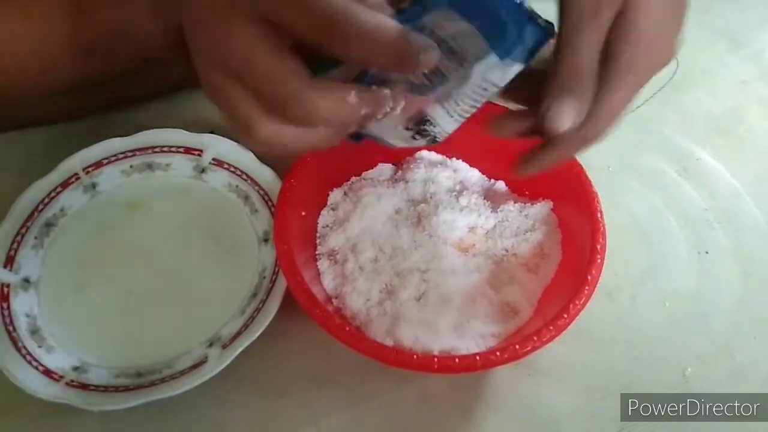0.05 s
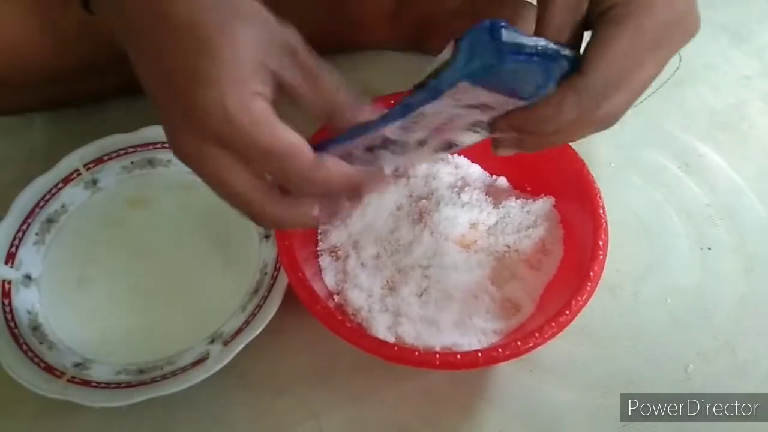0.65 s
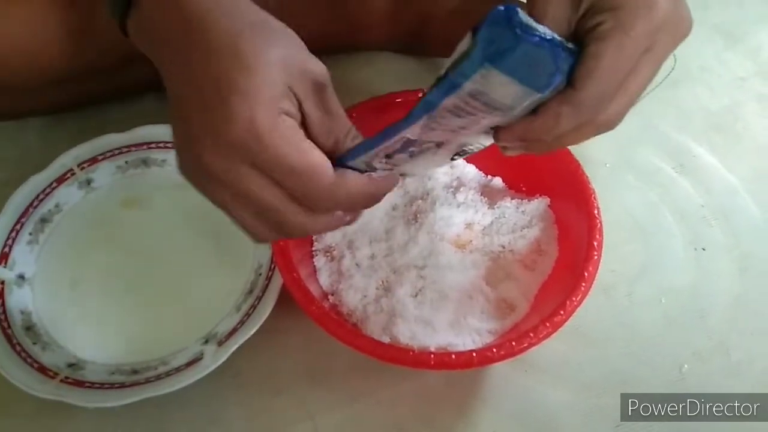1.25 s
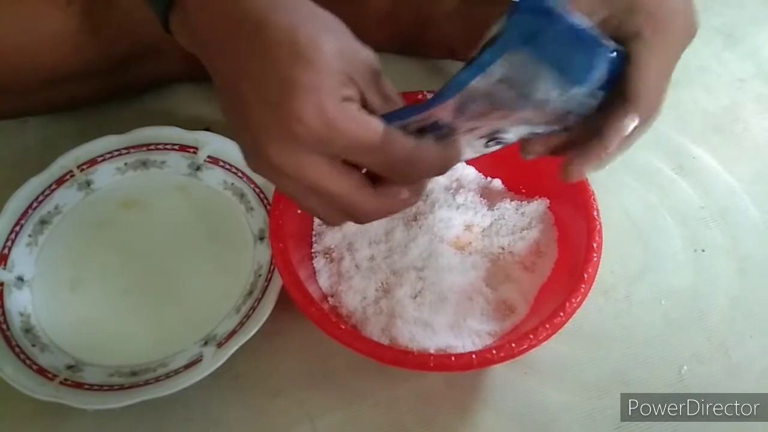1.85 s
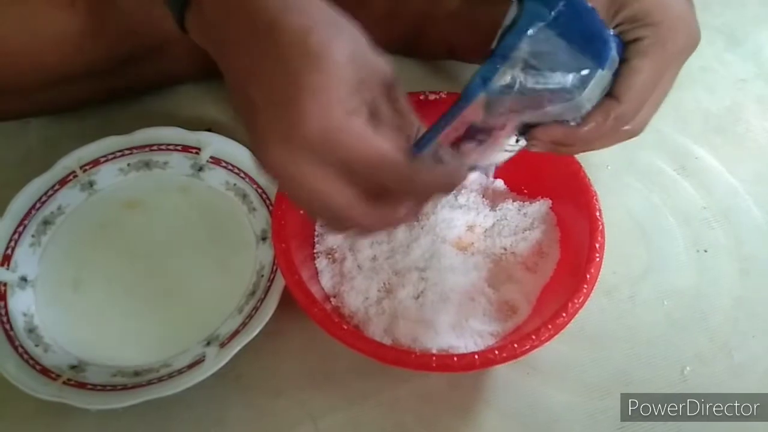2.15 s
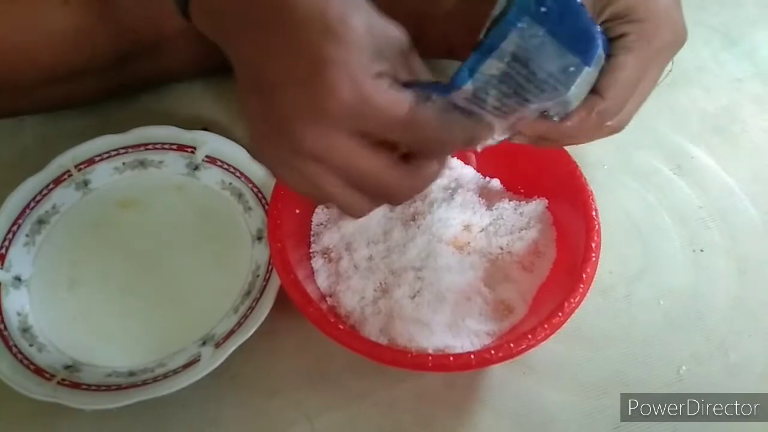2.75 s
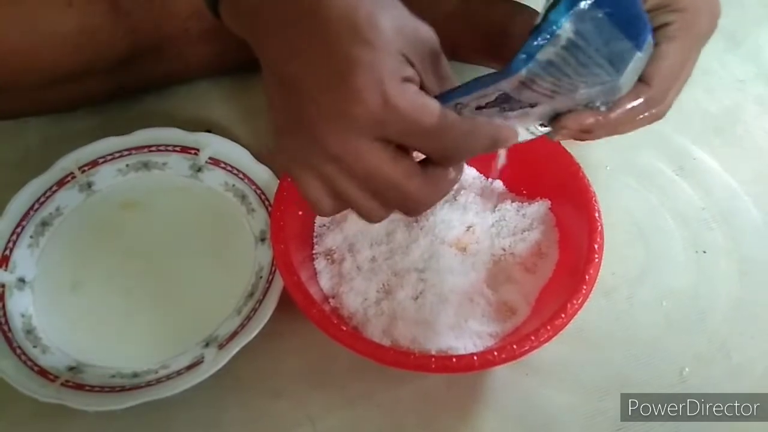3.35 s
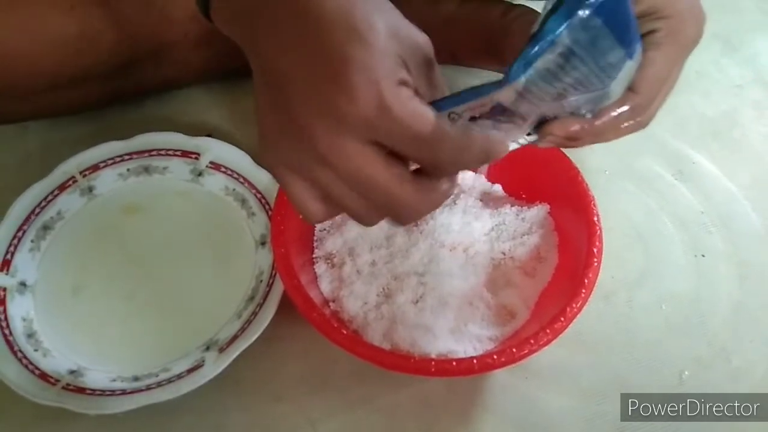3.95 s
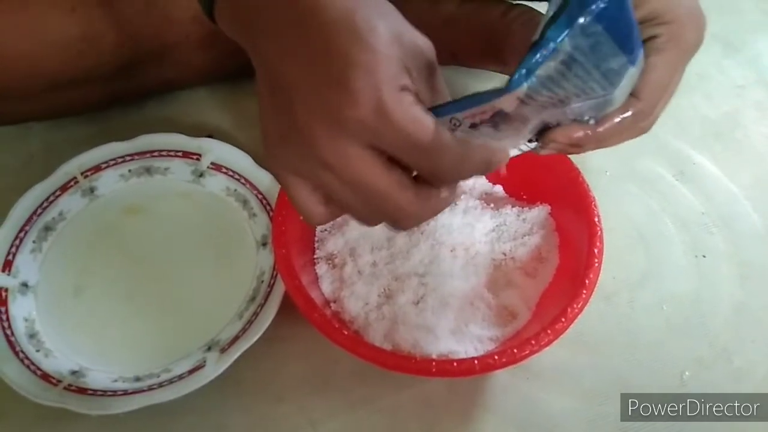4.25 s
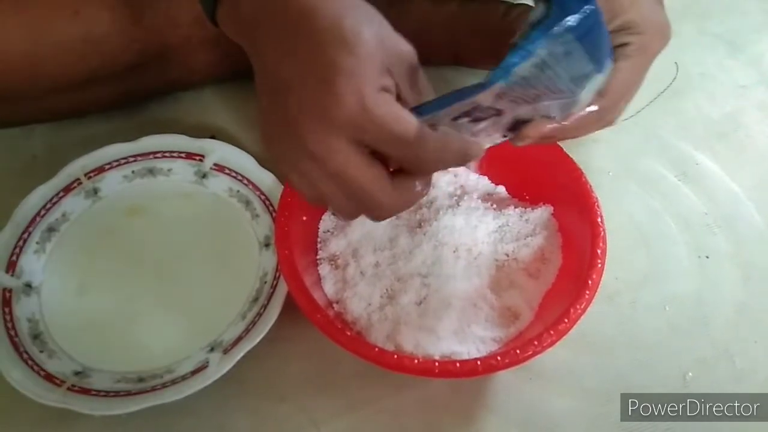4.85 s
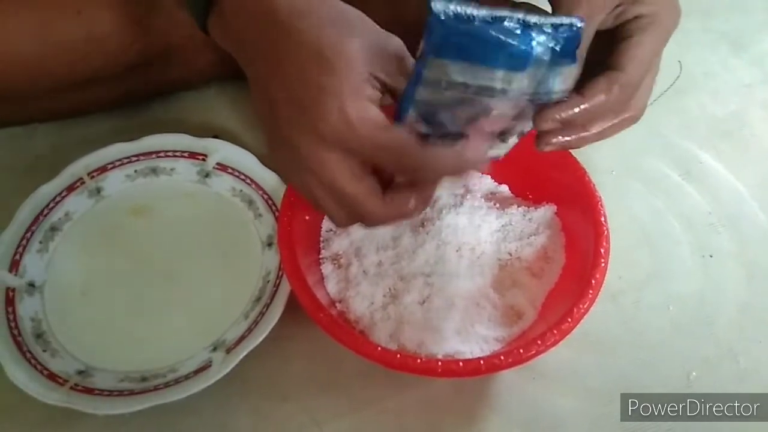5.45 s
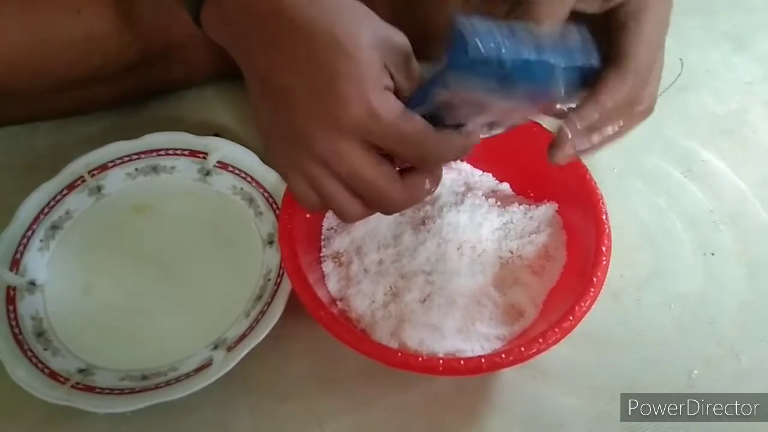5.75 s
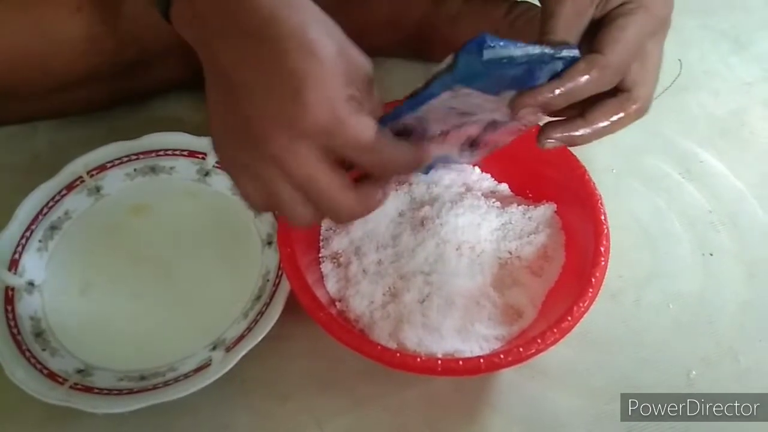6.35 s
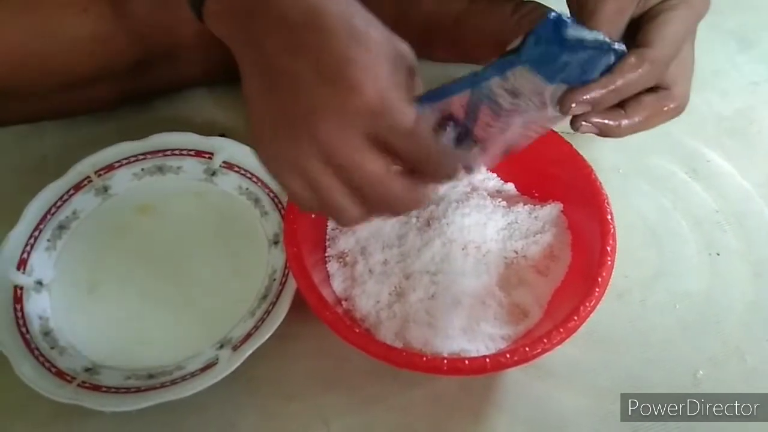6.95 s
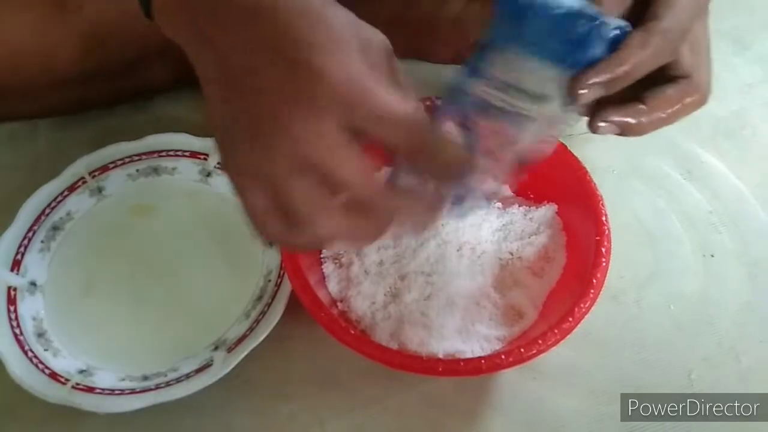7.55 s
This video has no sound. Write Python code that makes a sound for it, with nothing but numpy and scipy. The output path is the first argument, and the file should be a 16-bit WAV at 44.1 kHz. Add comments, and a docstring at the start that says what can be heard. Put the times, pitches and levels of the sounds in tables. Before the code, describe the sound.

Hands knead and shake a small plastic salt packet, making sharp crackles and quick gritty rattles, with faint traffic far outside.

```python
"""A plastic sachet of coarse salt is shaken and kneaded over a bowl, close by in a small hard room.
Each shake throws the salt against the plastic film. Each squeeze makes the creases crackle and snap,
and a few times a whole panel pops through. Loose grains patter on the heap or slide with a hiss.
Far traffic drones outside, and the two hands bump softly now and then."""
import sys
import numpy as np
from scipy import signal
from scipy.fft import next_fast_len
from scipy.io import wavfile

SR = 44100
rng = np.random.default_rng(int(sys.argv[2]) if len(sys.argv) > 2 else 0)


def dump(signal):
    """Clip the signal to [-1, 1] and save it as 16-bit WAV at the path in sys.argv[1]."""
    limited = np.clip(np.atleast_2d(signal).T, -1, 1)
    pcm = np.round(limited * 32767).astype(np.int16)
    wavfile.write(sys.argv[1], SR, pcm)


N = 338864
T = np.arange(N) / SR

# tone of the crackling film: (frequency [Hz], relative level [dB])
FILM_TONE = [(100, -38), (350, -26), (800, -21), (1400, -15.5), (2200, -7), (3500, 1), (5500, 1.5),
             (6500, 4.5), (7200, 1), (8100, -10.5), (9800, -9.5), (11500, -18.5), (15500, -20.5)]
# hollow resonances of the sachet between the hands: (frequency [Hz], width [Hz], boost [dB])
SACHET_RESONANCES = [(569, 256, 11), (1093, 286, 7.5), (1577, 184, 4), (2014, 360, 4.5)]


def amp(db):
    """Turns decibels into a gain."""
    return 10 ** (np.asarray(db) / 20)


def unit(x):
    """Scales a signal to an average strength (rms) of 1."""
    return x / np.sqrt(np.mean(x ** 2) + 1e-20)


def read(points, hz):
    """Looks up a table's value at hz, on a log-frequency axis."""
    f, value = np.transpose(points)
    return np.interp(np.log(hz + 1), np.log(f + 1), value)


def add(mix, s, sound):
    """Mixes a sound in at s seconds."""
    part = mix[max(round(s * SR), 0):][:len(sound)]
    part += sound[:len(part)]


def colour(points, resonances=(), size=2048):
    """Builds a filter (an impulse response of energy 1) with the given tone and resonances."""
    hz = abs(np.fft.fftfreq(size, 1 / SR))
    boost_db = sum(lift / (1 + (2 * (hz - f) / width) ** 2) for f, width, lift in resonances)
    log_gain = np.log(amp(read(points, hz) + boost_db))
    spectrum = np.exp(np.conj(signal.hilbert(log_gain)))  # minimum phase keeps clicks sharp
    response = np.fft.ifft(spectrum).real[:size // 2]
    return response / np.linalg.norm(response)


def through(x, response):
    """Filters a signal and keeps its length."""
    return signal.oaconvolve(x, response)[:len(x)]


def steadied(x, steady_s):
    """Evens out the strength to about 1 over any stretch of steady_s."""
    window = signal.windows.hann(int(2 * steady_s * SR) + 2)
    power = signal.oaconvolve(x ** 2, window / window.sum(), "same")
    return x / np.sqrt(abs(power) + 1e-9)


def dulled(x, edge_hz):
    """Softens everything above edge_hz."""
    return signal.sosfilt(signal.butter(2, edge_hz, fs=SR, output="sos"), x)


def murmur(width_hz):
    """Smooth random wavering (complex numbers); more width makes it faster."""
    hz = np.fft.fftfreq(next_fast_len(N), 1 / SR)
    phases = np.exp(2j * np.pi * rng.random(len(hz)))
    waver = np.fft.ifft(phases / (1 + (hz / width_hz) ** 4))[:N]
    return waver / np.std(waver)


def swelling(texture, s, width_s, db, hz, glide):
    """A gliding pitch, roughened by texture, that swells up to time s and fades."""
    tone = np.exp(2j * np.pi * np.cumsum(hz + glide * (T - s)) / SR)
    return amp(db) * np.exp(-.5 * ((T - s) / width_s) ** 2) * unit((tone * texture).real)


def grains(per_s, spread_db, ring_s, steady_s, click=1.08, top_hz=9000, size=220):
    """An even stream of tiny cracks, each a click with its own strength, pitch and short ring."""
    chance = rng.random((4, N))
    at = np.flatnonzero(chance[0] < per_s / SR)
    heft, pitch, ring = chance[1:, at, None]
    t = np.arange(size) / SR
    decay = ring_s * (.5 + ring)
    gain = amp(spread_db * np.minimum(-np.log(1 - heft), 4)) * (-1) ** at[:, None]
    cracks = gain * (np.exp(-t / decay) * np.cos(2 * np.pi * top_hz * pitch * t) + click * (t == 0))
    stream = np.bincount((at[:, None] + np.arange(size)).ravel(), cracks.ravel(), N + size)[:N]
    return steadied(stream, steady_s)


def kneading(grip_s=.0076, relax_s=.0058, held_db=-45.5, rest_db=-8.5):
    """How hard the fingers work the film: each squeeze tightens, holds and lets go."""
    # squeezes of the fingers: (start [s], length [s], level [dB])
    squeezes = [(0.057, 0.057, -37), (0.187, 0.12, -41.5), (0.486, 0.17, -36), (0.782, 0.28, -37),
                (1.49, .14, -38), (1.845, 0.11, -41.5), (1.98, 0.22, -37.5), (2.236, 0.087, -31.5),
                (2.474, 0.079, -37), (2.655, 0.32, -34), (3.222, 0.31, -37), (3.653, 0.5, -37),
                (4.219, 0.15, -35), (4.427, 0.075, -34), (4.803, 0.437, -45), (5.56, 0.21, -40),
                (5.885, 0.47, -34.5), (6.39, 0.23, -39.5), (6.859, 0.42, -34.5), (7.507, 0.18, -34.5)]
    # the film goes quieter while the hands change grip: (start [s], end [s])
    rests = [(.31, 0.51), (2.56, 2.64), (4.661, 4.71), (5.78, 5.84), (7.35, 7.53)]
    power = amp(held_db) ** 2
    for s, length, db in squeezes:
        tighten = np.clip((T - s) / grip_s + .5, 0, 1)
        relax = np.exp(-np.maximum(T - s - length, 0) / relax_s)
        power = power + (amp(db) * tighten * relax) ** 2
    resting = sum(np.clip(np.minimum(T - start, end - T) / grip_s, 0, 1) for start, end in rests)
    return np.sqrt(power) * amp(rest_db * resting)


def film_crackle(gain_db=-1, flurries_per_s=210, spread_db=3.6, flurry_s=.0022, floor=.2):
    """Creases give way in little avalanches: one crack sets off a flurry a few milliseconds long."""
    starts = rng.random(N) < flurries_per_s / SR
    strengths = amp(spread_db * np.minimum(rng.exponential(1, N), 2))
    flurries = signal.lfilter([1], [1, -np.exp(-1 / (flurry_s * SR))], starts * strengths) + floor
    cracks = grains(per_s=6500, spread_db=2.5, ring_s=.00025, steady_s=.004)
    crackle = through(steadied(flurries * cracks, steady_s=.057), colour(FILM_TONE, SACHET_RESONANCES))
    return amp(gain_db) * kneading() * dulled(crackle, edge_hz=11000)


def salt_trickle(patter_db=-3.5):
    """Loose grains patter on the heap; now and then some slide along the film with a thin hiss."""
    # tone of grains landing: (frequency [Hz], relative level [dB])
    landing_tone = [(300, -16), (1500, -20.5), (3500, -7.5), (6800, -2), (8500, -17.5), (12000, -31),
                    (16000, -27)]
    # flow of loose grains: (time [s], level [dB])
    flow = [(0, -54), (.28, -43.5), (.42, -57.5), (3.6, -38.5), (4.68, -71), (5.5, -43.5), (5.85, -49.5),
            (7.36, -35), (7.44, -47), (7.68, -41)]
    # sliding salt: (loudest at [s], swell width [s], level [dB], pitch [Hz], glide [Hz/s])
    slides = [(.33, .07, -53, 5500, -1), (5.599, 0.16, -47, 6400, -1000), (6.75, 0.19, -49, 6740, -1)]
    patter = through(grains(per_s=1500, spread_db=4.5, ring_s=.00023, steady_s=.058), colour(landing_tone))
    out = amp(patter_db + np.interp(T, *np.transpose(flow))) * patter
    hiss = murmur(width_hz=370)
    for slide in slides:
        out += swelling(hiss, *slide)
    return out


def far_traffic(waver=.35):
    """Far engines drone in and out of the street's rumble."""
    # tone of the rumble: (frequency [Hz], relative level [dB])
    street_tone = [(20, -29), (45, -19), (65, -16.5), (90, 3), (135, 0), (200, -5), (300, -12),
                   (450, -17.5), (1000, -20.5), (4000, -30), (15000, -55)]
    # slow swell of the rumble: (time [s], level [dB])
    swell = [(0, -52.5), (4, -51), (5.6, -53), (7.68, -51)]
    # engines: (loudest at [s], swell width [s], level [dB], pitch [Hz], glide [Hz/s])
    engines = [(.4, 0.4, -52.5, 146, 7.5), (.45, .4, -54.5, 165, 14), (1.717, 0.35, -56, 141, 2.5),
               (1.6, 0.69, -57, 80, 6), (5.63, 0.51, -53.5, 139, 0.5)]
    rumble = through(rng.standard_normal(N), colour(street_tone, size=8192))
    out = amp(np.interp(T, *np.transpose(swell))) * rumble
    for engine in engines:
        out += swelling(1 + waver * murmur(width_hz=4), *engine)
    return out


def salt_shakes(gain_db=-2.5, body_hz=1900):
    """Salt hits the film in a dense spray and settles; a gentle shake lasts longer and sounds deeper."""
    # shakes, in bouts of about 13 a second: (loudest at [s], level [dB])
    shakes = [(0.023, -31), (.262, -32.5), (0.498, -29), (.529, -30), (.837, -29.5), (.883, -31.5),
              (.99, -45), (1.034, -30), (1.198, -29.5), (1.264, -28.5), (1.323, -27), (1.413, -33),
              (1.693, -25.5), (1.917, -31), (2.275, -26.5), (2.362, -18), (2.431, -26.5), (2.642, -23.5),
              (2.826, -27), (2.931, -23), (3.006, -23.5), (3.074, -28), (3.152, -27), (3.262, -28),
              (3.291, -24), (3.358, -20.5), (3.51, -31), (3.582, -19), (3.679, -23.5), (3.754, -19),
              (3.851, -22.5), (3.932, -19), (4.022, -26.5), (4.083, -24.5), (4.16, -25.5), (4.228, -26.5),
              (4.309, -25.5), (4.393, -27.5), (4.586, -31.5), (4.728, -34.5), (4.802, -31.5),
              (4.875, -27.5), (4.961, -25.5), (5.03, -23.5), (5.119, -26), (5.185, -27.5), (5.279, -27.5),
              (5.346, -31), (5.847, -35.5), (5.931, -25), (6.124, -31), (6.236, -23), (6.376, -29),
              (6.454, -22), (6.527, -25.5), (6.609, -26), (6.691, -27), (6.987, -26.5), (7.089, -23),
              (7.32, -21), (7.48, -28), (7.585, -22.5)]
    # tone of salt hitting the film: (frequency [Hz], relative level [dB])
    salt_tone = [(80, -32.5), (250, -17), (420, -27.5), (800, -22), (1400, -19), (2200, -10.5), (3600, -2),
                 (5500, -2), (6400, 1), (7200, -1.5), (8100, -13), (9800, -13), (11500, -24.5),
                 (15500, -28.5)]
    usual_db, rise_s, fall_s, body_db = -27, .0073, .0072, 2.18  # an ordinary shake
    briefer_per_db, body_per_db = .0288, -.4  # how a harder one differs
    high_power, low_power = np.zeros((2, N))
    for s, db in shakes:
        force_db = db - usual_db
        width_s = np.where(T < s, rise_s, fall_s) * np.exp(-briefer_per_db * force_db)
        from_peak = np.minimum(abs(T - s) / width_s, 20)
        swell = amp(db) ** 2 * np.exp(-.5 * from_peak ** 1.744)  # a slightly pointed bell curve
        high_power += swell
        low_power += swell * amp(body_db + body_per_db * force_db) ** 2
    hits = grains(per_s=7000, spread_db=5, ring_s=.00031, steady_s=.066)
    spray = through(hits, colour(salt_tone, SACHET_RESONANCES))
    low = dulled(spray, body_hz)
    return amp(gain_db) * (np.sqrt(high_power) * (spray - low) + np.sqrt(low_power) * low)


def panel_pops(sag_per_s=5):
    """A whole panel of the sachet flips; its pitch sags as the film goes slack."""
    # panels popping through: (time [s], level [dB], pitch [Hz], decay [s])
    pops = [(.0265, -16, 2430, 0.0019), (.921, -31, 1220, 0.0047), (2.065, -24, 2200, 0.0024),
            (3.1, -30, 2080, .003)]
    out, t = np.zeros(N), np.arange(SR // 20) / SR
    for s, db, hz, decay in pops:
        phase = 2 * np.pi * np.cumsum(hz * np.exp(-sag_per_s * t)) / SR
        add(out, s, amp(db) * np.exp(-t / decay) * np.sin(phase))
    return out


def crease_snaps(click=.79, ring_cycles=2.3, flutter_gain=.36, flutter_s=.0031, size=900):
    """A crease flips with a click and a few cycles of its own pitch; the film around it flutters on."""
    # creases that stand out: (time [s], level of the first millisecond [dB], pitch [Hz])
    big_snaps = [(.027, -17.5, 3680), (0.0655, -19.5, 5440), (.433, -33, 4950), (0.565, -17.5, 6240),
                 (.6701, -21.5, 6300), (.7732, -21.5, 5550), (0.7839, -21.5, 5100), (0.905, -20.5, 5750),
                 (0.923, -18.5, 6800), (.9544, -19, 4340), (1.1135, -20.5, 6700), (1.247, -20, 5560),
                 (1.3229, -16, 4350), (1.4075, -19.5, 6300), (1.413, -20, 6700), (1.5704, -19.5, 4430),
                 (1.6839, -18.5, 4570), (1.7662, -24.5, 4470), (1.89, -23.5, 4870), (1.9906, -20, 6100),
                 (2.065, -22, 5550), (2.219, -18.5, 4700), (2.4209, -15.5, 5500), (2.6325, -25, 5600),
                 (2.7556, -18, 6860), (2.7719, -19, 6600), (2.8356, -17.5, 6040), (2.8683, -24, 6550),
                 (2.9312, -13.5, 6500), (3.0874, -16.5, 3640), (3.1025, -16, 4550), (3.196, -19.5, 6000),
                 (3.351, -15, 5800), (3.374, -16.5, 5800), (3.5535, -14, 6130), (3.573, -12.5, 6100),
                 (3.6466, -16, 5900), (3.8481, -14, 6560), (3.8529, -9, 6650), (3.9718, -18, 6200),
                 (3.994, -20, 5680), (4.077, -11.5, 6500), (4.2072, -21, 5750), (4.393, -14, 6400),
                 (4.716, -22.5, 4600), (4.7464, -20.5, 6200), (4.8093, -20.5, 5850), (4.8549, -20, 5910),
                 (4.9677, -24, 5690), (5.006, -22, 5500), (5.023, -22, 5480), (5.0484, -18.5, 5930),
                 (5.132, -22.5, 5750), (5.2121, -16.5, 4770), (5.2814, -24, 5100), (5.4716, -26.5, 4650),
                 (5.9134, -19.5, 6860), (5.9907, -20.5, 4800), (6.1698, -21, 5900), (6.2, -17, 6150),
                 (6.2283, -16, 5730), (6.7885, -23.5, 4700), (6.8564, -19.5, 4400), (6.8823, -18, 6860),
                 (7.1917, -20.5, 5990), (7.3042, -14.5, 4430)]
    per_s, over_kneading_db, middle_hz, range_octaves = 8, 7, 4450, 1.84  # small, random snaps
    at = rng.random(N) < per_s / SR
    pitches = middle_hz * 2 ** (range_octaves * (rng.random(N) - .5))
    small_snaps = zip(T[at], over_kneading_db + 20 * np.log10(kneading()[at]), pitches[at])
    out, t = np.zeros(N), np.arange(size) / SR
    film = colour(FILM_TONE, SACHET_RESONANCES)
    noise = dulled(rng.standard_normal(N + size), edge_hz=9000)
    for s, db, hz in big_snaps + list(small_snaps):
        flip = np.exp(-hz * t / ring_cycles) * np.cos(2 * np.pi * hz * t) + click * (t == 0)
        flutter = flutter_gain * unit(noise[round(s * SR):][:size]) * np.exp(-t / flutter_s)
        snap = through(flip + flutter, film)
        add(out, s, amp(db) * snap / np.std(snap[:SR // 1000]))
    return out


def hand_bumps():
    """Hands and arms push and rub with dull thuds that swell and die without ringing."""
    # soft bumps: (time [s], level [dB], pitch [Hz], width [Hz], decay [s])
    bumps = [(1.78, -48, 148, 35, 0.046), (4.86, -44.5, 92.6, 30, 0.066), (6.28, -45, 258.7, 36, 0.044),
             (6.24, -47, 261.3, 140.4, 0.055), (6.47, -47.5, 280, 213, 0.067),
             (6.56, -41.5, 140, 32.41, 0.028), (7.31, -51, 189.6, 45, 0.021)]
    out = np.zeros(N)
    for s, db, hz, width, decay in bumps:
        age = np.maximum(T - s, 0) / decay
        rub = unit((murmur(width) * np.exp(2j * np.pi * hz * T)).real)
        out += amp(db) * 2 * np.sqrt(age) * np.exp(-age) * rub
    return out


def room(x, echo_db=-11.5, gap_s=.0083):
    """Hard walls add a wash of duller echoes, each frequency dying at its own speed."""
    # ring of the room: (frequency [Hz], time to fade by 60 dB [s])
    ring_times = [(200, 1), (1000, 1), (4000, 0.17), (7000, 0.54), (14000, 0.91)]
    hz, t, bands = signal.stft(rng.standard_normal(SR), SR, nperseg=256)
    fade = amp(-60 * t / read(ring_times, hz)[:, None])
    tail = signal.istft(bands * fade, SR, nperseg=256)[1]
    tail = tail * (np.arange(len(tail)) > gap_s * SR)
    echoes = through(x, tail / np.linalg.norm(tail))
    return x + amp(echo_db) * dulled(echoes, edge_hz=8000)


def scene():
    """The sachet and the hands in the room, over the far street."""
    close = salt_shakes() + film_crackle() + crease_snaps() + panel_pops() + salt_trickle() + hand_bumps()
    return (room(close) + far_traffic())[None]


def record(dry):
    """Overload rounds off the loudest snaps; then the very highest treble is cut."""
    ceiling, edge_hz = .8, 15750
    rounded = dry / (1 + (dry / ceiling) ** 4) ** (1 / 4)
    treble_cut = signal.firwin(401, edge_hz, window=("kaiser", 9), fs=SR)
    return signal.oaconvolve(rounded, treble_cut[None], "same")


dry = scene()
out = record(dry)
dump(out)
```